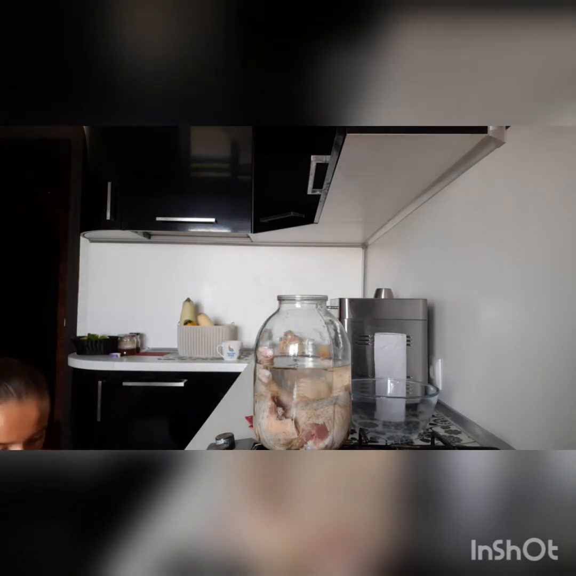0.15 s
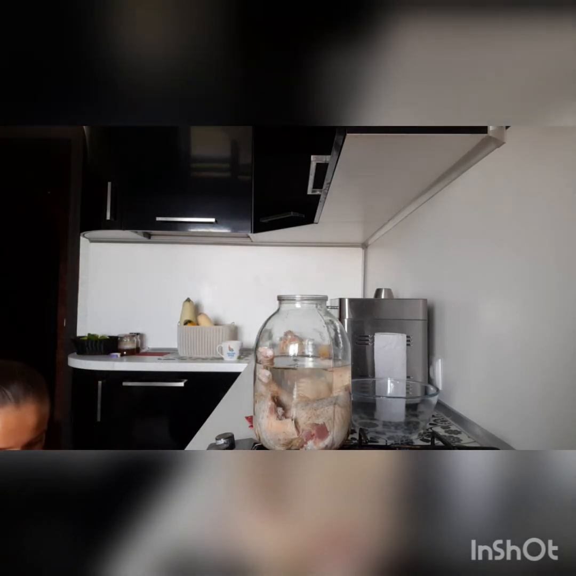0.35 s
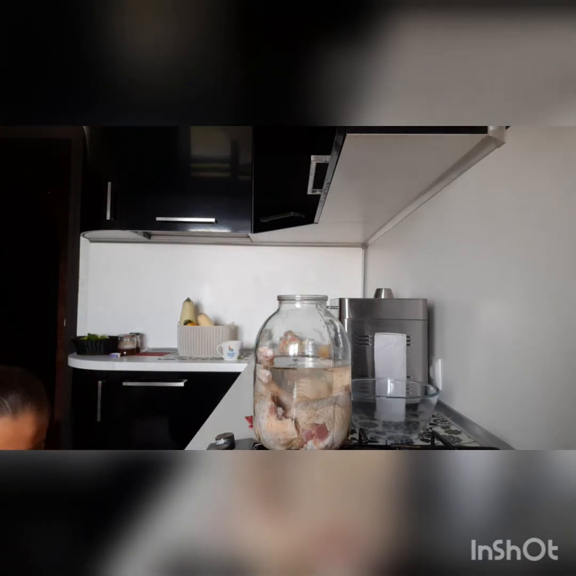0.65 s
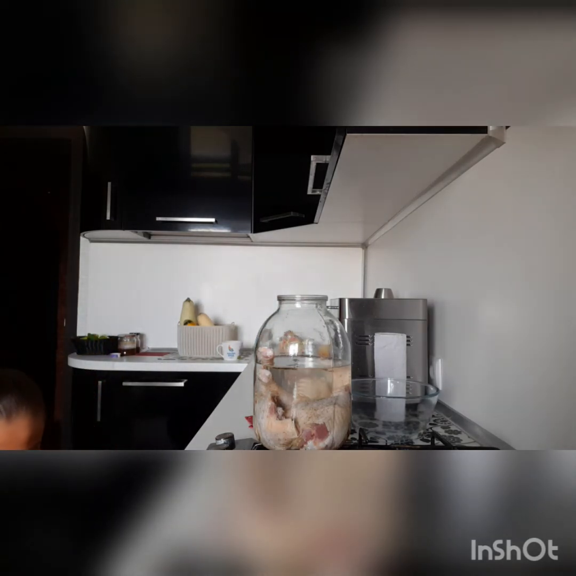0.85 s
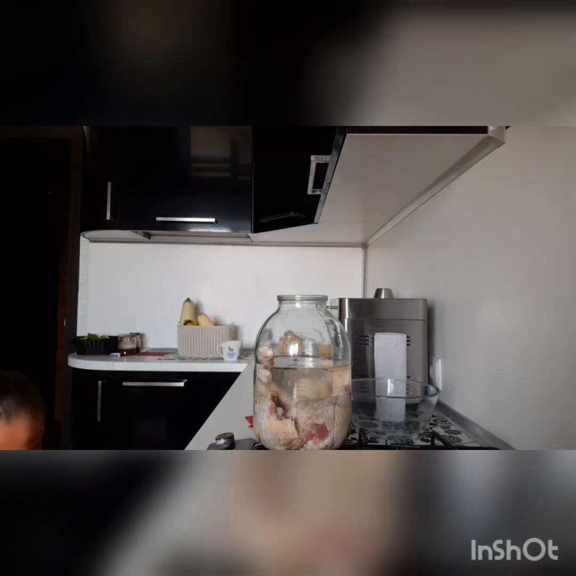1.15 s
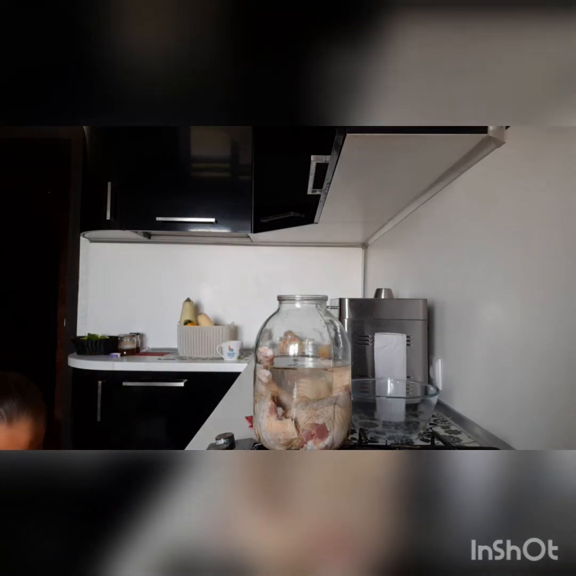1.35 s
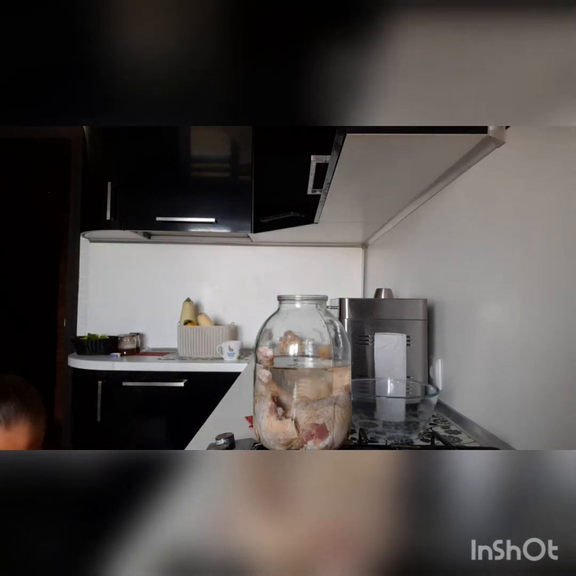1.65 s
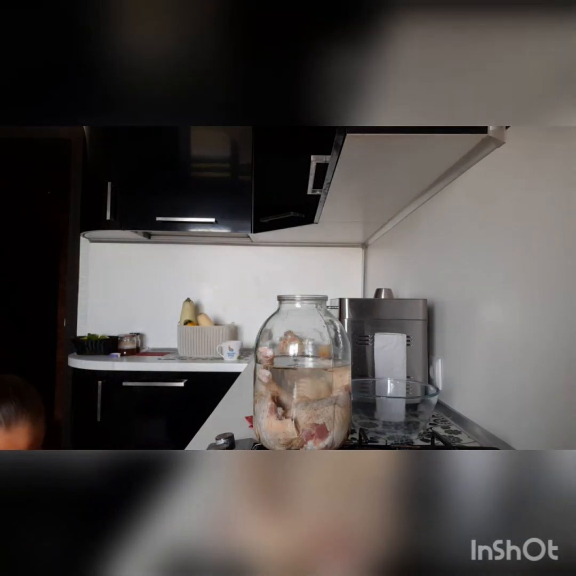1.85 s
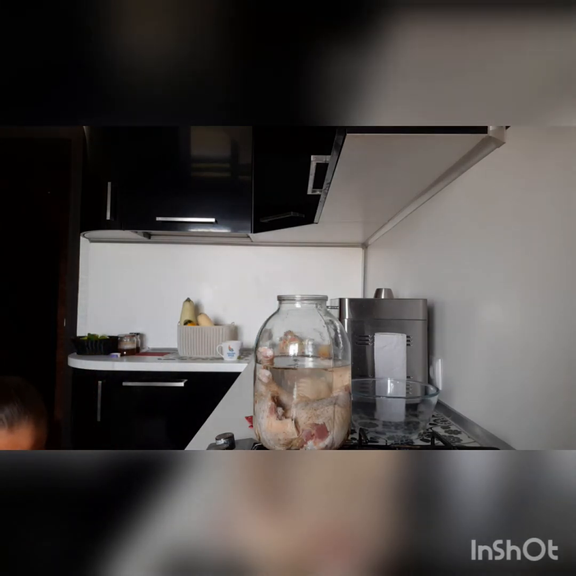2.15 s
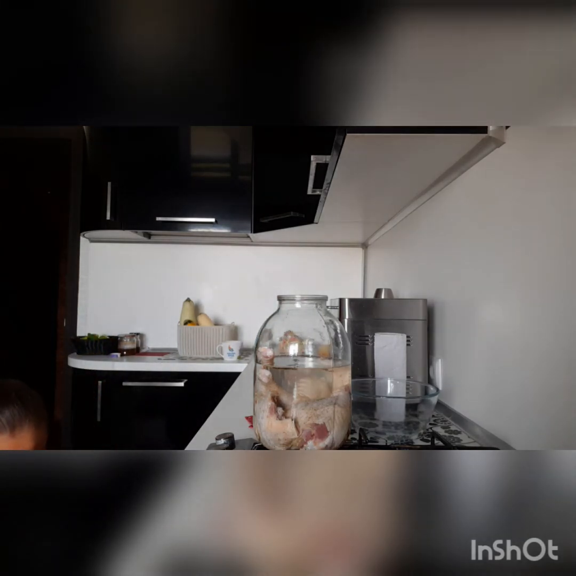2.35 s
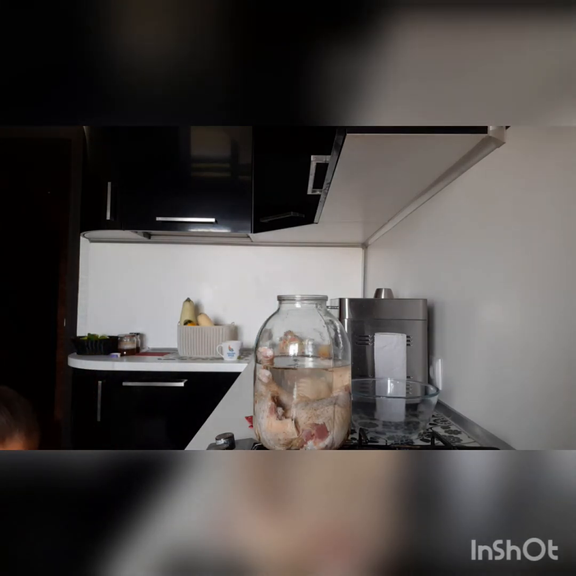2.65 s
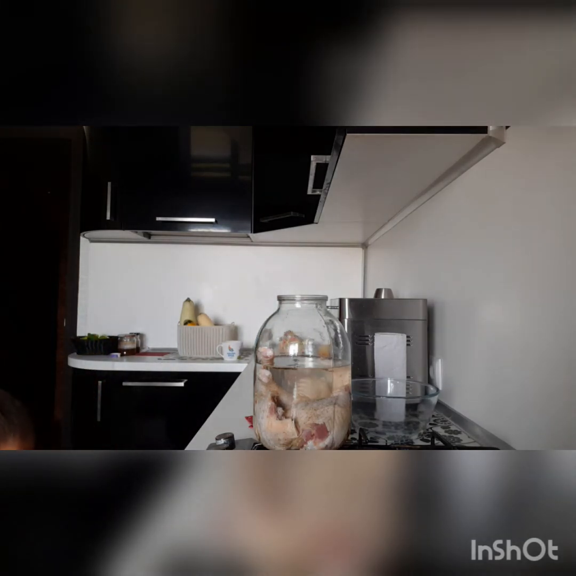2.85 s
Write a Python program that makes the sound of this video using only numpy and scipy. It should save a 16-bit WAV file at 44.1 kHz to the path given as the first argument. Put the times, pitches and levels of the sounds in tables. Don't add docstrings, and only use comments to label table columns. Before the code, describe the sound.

Wire rack dragged on enamel oven rails: a short clattering burst, about a second of near quiet, then louder knocks and fading scrapes with hollow booms; small live kitchen, distant stereo microphone, low refrigerator hum.

```python
import sys
import numpy as np
from scipy import signal
from scipy.fft import rfft, irfft
from scipy.io import wavfile

SR = 44100
rng = np.random.default_rng(int(sys.argv[2]) if len(sys.argv) > 2 else 0)


def transcribe(signal):
    frames = np.atleast_2d(signal).T
    limited = np.clip(frames, -1, 1)
    pcm = np.round(limited * 32767).astype(np.int16)
    wavfile.write(sys.argv[1], SR, pcm)


N = 132300


def from_db(db):
    return 10 ** (np.asarray(db) / 20)


def rms_one(x):
    return x / np.sqrt(np.mean(x ** 2) + 1e-20)


def at_hz(points, hz):
    table_hz, values = np.array(points).T
    return np.interp(np.log(hz + 1e-9), np.log(table_hz), values)


def colour(x, spectrum):
    gain = from_db(at_hz(spectrum, np.fft.rfftfreq(N, 1 / SR)))
    return irfft(rfft(x) * rms_one(gain), N)


def highpass(x, order, hz):
    return signal.sosfilt(signal.butter(order, hz, "high", fs=SR, output="sos"), x)


def drift(rate):
    r = np.exp(-2 * np.pi * rate / SR)
    noise = rng.standard_normal(N + SR)
    return rms_one(signal.lfilter([1], [1, -2 * r, r * r], noise)[SR:])


def ring(x, hz, t60):
    r = from_db(-60 / (max(t60, .003) * SR))
    w = 2 * np.pi * hz / SR
    return signal.lfilter([0, 2 * np.sin(w) * np.sqrt(1 - r)], [1, -2 * r * np.cos(w), r * r], x + 1e-18)


def stroke(start, length, fade_db, attack):
    t = np.arange(N) / SR - start
    rise = np.clip(t / attack, 0, 1)
    fall = np.clip((length - t) / attack + 1, 0, 1)
    return rise * fall * from_db(-fade_db * np.clip(t / length, 0, 1))


# pitch [Hz], left-right likeness [0 to 1].
PORT_LIKENESS = [(50, .93), (130, .95), (300, .72), (700, .65), (1500, .3), (3000, .05), (14000, .02)]
# pitch [Hz], left over right [dB].
PORT_LEAN = [(60, -2), (180, -3), (350, 0), (1000, 0), (14000, -0.5)]
RIGHT_LAG = 12.55


def ports(mid, side):
    hz = np.fft.rfftfreq(len(mid), 1 / SR)
    alike = np.clip(at_hz(PORT_LIKENESS, hz), 0, 1)
    lean = from_db(at_hz(PORT_LEAN, hz) / 2)
    m = rfft(mid) * np.sqrt((1 + alike) / 2)
    s = rfft(side) * np.sqrt((1 - alike) / 2)
    late = np.exp(-2j * np.pi * hz * RIGHT_LAG / SR)
    return irfft([(m + s) * lean, (m - s) / lean * late], len(mid))


# pitch [Hz], width [Hz], level [dB].
WHINES = [(214.7, 17, -63.5), (278, 2.9, -69.5), (587, 17, -83), (1062, 87, -68), (1573, 54, -70)]
# pitch [Hz], level [dB per Hz].
AIR_COLOUR = [(18, -77), (30, -53), (106, 2), (157, -29.5), (426, -25.5), (569, -17.5), (1670, -26.5),
              (1960, -37), (16000, -63.5)]
AIR_DB = -64.5
HUM_HZ, HUM_DB, HUM_WAVER_DB = 100, -53.5, 1.8
RUMBLE_HZ, RUMBLE_DB = 80, -60.5


def refrigerator_noise():
    whine = sum(from_db(db) * rms_one(ring(rng.standard_normal(N), hz, 1.0 / width))
                for hz, width, db in WHINES)
    air = highpass(colour(rng.standard_normal(N), AIR_COLOUR), 2, 130)
    air = air * from_db(0.5 * drift(2))
    rumble = from_db(RUMBLE_DB) * rms_one(ring(rng.standard_normal(N), RUMBLE_HZ, 0.0276))
    return whine + from_db(AIR_DB) * rms_one(air) + rumble


def refrigerator():
    level = from_db(HUM_DB + 4 + HUM_WAVER_DB * drift(3.4))
    hum = level * np.sin(2 * np.pi * HUM_HZ * np.arange(N) / SR)
    return ports(refrigerator_noise() + hum, refrigerator_noise())


ATTACK_S, LONGEST_RING_S = .003, .08
# start [s], length [s], pitch [Hz], level [dB], t60 [s].
SINGING = [(0.108, 0.13, 3368, -44, 0.015), (0.098, 0.04, 3300, -32, 0.0046),
           (0.107, 0.033, 4000, -30.5, 0.011), (0.093, 0.018, 6060, -45, 0.026),
           (0.294, 0.021, 4120, -47.5, .06), (0.333, 0.088, 5320, -52, 0.045), (.4, .18, 5320, -61, .08),
           (.14, .14, 11400, -44, .006), (1.638, .04, 12000, -33, .003), (1.875, .1, 11300, -43, .006),
           (1.99, .05, 12800, -41, .003), (1.995, .055, 10200, -44, .007), (2.065, .07, 9400, -46, .008),
           (0.16, 0.034, 1060, -38.5, .05), (0.19, 0.029, 720, -36, .06), (1.55, 0.02, 394, -37.5, .12),
           (1.65, 0.066, 510, -35, .1), (1.87, 0.056, 528, -45, .05), (1.984, 0.036, 530, -38, 0.035),
           (2.801, 0.041, 3100, -73, .03), (1.8, 0.046, 1100, -42, .03), (1.113, 0.031, 1850, -53, 0.01),
           (1.114, 0.089, 2330, -67, .01), (1.47, 0.043, 823, -36.5, 0.065), (1.44, 0.037, 426, -37, 0.097),
           (1.53, 0.046, 750, -42.5, 0.12), (1.68, 0.021, 2880, -47.5, 0.13),
           (2.226, 0.17, 2120, -58.5, 0.042), (1.6, 0.1, 2000, -66, 0.012), (0.7, 0.13, 1763, -69, 0.07),
           (0.78, 0.11, 597, -60, 0.052), (2.7, 0.04, 850, -52, .05)]
SKIRT_S, SKIRT_CYCLES = .012, 30
SING_FADE_DB = 7


def singing_wires():
    rub, out = rng.standard_normal(N), 0
    for start, length, hz, db, t60 in SINGING:
        rubbed = rub * stroke(start, length, SING_FADE_DB, ATTACK_S)
        tone = ring(rubbed, hz, min(t60, LONGEST_RING_S))
        out = out + from_db(db) * ring(tone, hz, min(SKIRT_S, SKIRT_CYCLES / hz)) / 8
    return out


GRIP_DB, GRIP_PER_S = 4.5, 1.1


def gripped_modes(push, modes, level_db):
    out = 0
    for hz, db, t60 in modes:
        grip = from_db(GRIP_DB * drift(GRIP_PER_S))
        out = out + from_db(level_db + db) * ring(push * grip, hz, min(t60, LONGEST_RING_S))
    return out


# start [s], length [s], chatter [dB],
# oven walls above the chatter [dB], treble above the chatter [dB].
CONTACTS = [(-.02, .02, -55, 2.5, 4.5), (0.095, 0.014, -55, 3, 5), (0.106, 0.016, -42, 0.5, 4),
            (0.118, 0.078, -34, 0, 5.5), (0.192, 0.043, -40.5, -1.5, 2), (0.244, 0.071, -44.5, 1, 6),
            (0.322, 0.055, -39.5, 0.5, 5.5), (0.4, 0.061, -68, -22, 10), (1.08, 0.11, -80.5, -16, 7),
            (1.419, 0.041, -53, 9.5, 4.5), (1.438, 0.015, -37.5, 0, 0), (1.444, .05, -32.5, 2, 0.5),
            (1.503, 0.022, -44, -4, 2), (1.54, 0.071, -52.5, 3, 1), (1.63, 0.05, -28.5, -1, 6.5),
            (1.69, 0.066, -51, -3, 10.5), (1.842, 0.044, -41.5, 0.5, 9.5), (1.871, .03, -41, -3, -2),
            (1.891, 0.059, -38.5, -5, 4.5), (1.959, 0.045, -50, -1, 1), (1.983, 0.018, -41, -1.5, 12.5),
            (1.999, 0.05, -38, -3, 6.5), (2.057, 0.083, -42, 0, 5), (2.139, 0.04, -45, 0, -8),
            (2.201, 0.099, -47, -1, -3), (2.328, 0.0668, -53.5, 1, 1.5), (2.482, 0.086, -60.5, 3, -8),
            (2.651, 0.071, -58, 0.5, -9), (2.777, 0.16, -67, 6, -36.5), (2.936, 0.04, -61.5, 6, 0),
            (2.966, .05, -60, 0, 4)]
# pitch [Hz], level [dB], t60 [s].
WIRE_MODES = [(2093, 12.5, 0.033), (2480, -39.5, 0.34), (2680, 4.5, 0.031), (2760, -0.5, .12),
              (3190, -51, 0.36), (3315, -2, 0.24), (3580, -1, .12), (4120, -14, 0.086), (4180, -12.5, 0.15),
              (4400, -12, 0.11), (4800, -3.5, 0.063)]
# pitch [Hz], level [dB], t60 [s].
WALL_MODES = [(416, -1, 0.17), (506, -10, .08), (539, -9, 0.069), (568, -1, 0.059), (675, -4, 0.13),
              (764, -5, .07), (820, 2.5, 0.04), (891, -1, 0.03), (918, -3.5, 0.11), (1116, -19, 0.08),
              (1252, -1.5, 0.057), (1587, -1, 0.12)]
# pitch [Hz], level [dB per Hz].
CHATTER_COLOUR = [(500, -30), (1000, -8.5), (2000, 2), (3500, -4), (5000, -4), (7500, -15.5), (11500, -15),
                  (16000, -19.5)]
# pitch [Hz], level [dB per Hz].
WALL_COLOUR = [(130, -17), (230, -6), (330, -9), (450, -9.5), (650, -4), (900, -5.5), (1300, -6.5),
               (2500, -37.5)]
TICKS_PER_S, TICK_SPREAD_DB, JUDDER_DB, JUDDER_PER_S = 2500, 4, 1, 41
FADE_DB_PER_S, TREBLE_HZ = 46.5, 4820
SOFT_ATTACK_S, SOFT_BELOW_DB = 0.048, -60
CRACK_DB = 19
WALLS_LATE_S = .002
WIRES_DB, WALL_RING_DB = -23.5, -5


def rack():
    sizes = from_db(TICK_SPREAD_DB * np.minimum(rng.exponential(1, N), 5)) * rng.choice([-1, 1], N)
    happens = rng.random(N) < TICKS_PER_S / SR
    ticks = rms_one(sizes * happens * from_db(JUDDER_DB * drift(JUDDER_PER_S)))
    strokes = []
    for start, length, db, _, _ in CONTACTS:
        firm = db > SOFT_BELOW_DB
        attack = ATTACK_S if firm else SOFT_ATTACK_S
        row = ticks * from_db(db) * stroke(start, length, FADE_DB_PER_S * length, attack)
        row[max(int((start + ATTACK_S) * SR), 0)] += from_db(db + CRACK_DB) * firm
        strokes.append(row)
    strokes = np.array(strokes)
    chatter = strokes.sum(0)
    on_walls = from_db(np.array(CONTACTS)[:, 3]) @ strokes
    on_walls = np.roll(on_walls, int(WALLS_LATE_S * SR))
    bright = from_db(np.array(CONTACTS)[:, 4]) @ strokes

    wires = gripped_modes(chatter, WIRE_MODES, WIRES_DB - 14.0)
    walls = gripped_modes(on_walls, WALL_MODES, WALL_RING_DB - 11.0)
    treble_cut = 1 + (TREBLE_HZ / (np.fft.rfftfreq(N, 1 / SR) + 1)) ** 4
    treble = irfft(rfft(bright - chatter) / treble_cut, N)
    scrape = colour(chatter + treble, CHATTER_COLOUR)
    return scrape + wires + walls + singing_wires() + from_db(1.5) * colour(on_walls, WALL_COLOUR)


# start [s], level [dB], pitch favoured [Hz], length [s].
THUDS = [(0.112, -34, 130, 0.062), (0.144, -36.5, 70.1, 0.096), (0.244, -38.5, 152.4, 0.057),
         (0.318, -37.5, 169, 0.053), (0.341, -38.5, 69.6, 0.088), (1.441, -33.5, 91.7, 0.056),
         (1.63, -29, 290, 0.035), (1.699, -37, 167, 0.046), (1.848, -36, 148, 0.086),
         (1.901, -42.5, 204, 0.023), (1.987, -31.5, 90.6, 0.083), (2.07, -38, 79.3, 0.17),
         (2.127, -42, 178, 0.053), (2.207, -42.5, 222, 0.072), (2.322, -44, 128, 0.0775),
         (2.439, -47, 172, .05), (2.527, -44.5, 96.5, .08), (2.726, -46.5, 84.5, .2),
         (1.15, -50.5, 74.6, .18)]
# pitch [Hz], level [dB], t60 [s].
CABINET_MODES = [(59.4, -25, .3), (75.2, -2, 0.58), (98.3, -9.5, .25), (118.2, -5.5, 0.058),
                 (167, -5.5, 0.076), (189.4, -6.5, 0.082), (247, -8, .05), (290, -1, 0.06)]
THUD_OCTAVES = 0.8
THUD_FADE_DB = 6.5
LONGEST_BOOM_S = .2


def cabinet():
    out = 0
    for hz, mode_db, t60 in CABINET_MODES:
        force = 0
        for start, db, favoured_hz, length in THUDS:
            nearness = np.exp(-(np.log2(hz / favoured_hz) / THUD_OCTAVES) ** 2)
            force = force + from_db(db + mode_db) * nearness * stroke(start, length, THUD_FADE_DB, 0.0025)
        out = out + ring(rng.standard_normal(N) * force, hz, min(t60, LONGEST_BOOM_S * 100 / hz))
    return highpass(out, 4, 44)


# start [s], peak [dB], pitch [Hz], length [s].
BOOMS = [(.132, -30.5, 115.7, .018), (0.151, -26, 84.2, 0.038), (0.213, -30.5, 88.3, 0.025),
         (.276, -29, 91.3, 0.015), (0.373, -38.5, 94, 0.018), (0.375, -38.5, 80, 0.0096),
         (1.455, -30.5, 117, 0.021), (1.494, -37.5, 117, 0.0094), (1.547, -37, 112, 0.013),
         (1.634, -20.5, 125, 0.041), (1.698, -26.5, 132, 0.018), (1.735, -30, 112.3, 0.028),
         (1.881, -26, 116.3, 0.034), (1.93, -32, 135, 0.015), (1.975, -32, 109.6, 0.046),
         (2.095, -35.5, 134, 0.02), (2.212, -31, 94.6, 0.024), (2.263, -33, 103, 0.012),
         (2.338, -43.5, 83.5, 0.026)]
SHARP_SHARE, SAG_S, HARD_DB = 1, 0.0054, -19
BOOM_RISE_S, BOOM_FALL_S = 0.0083, 0.0062


def side_panel():
    t, out = np.arange(N) / SR, 0
    for start, db, hz, length in BOOMS:
        u = np.clip(t - start, 0, None)
        sharp = SHARP_SHARE * from_db(min(db - HARD_DB, 0))
        turns = hz * (u + sharp * SAG_S * (1 - np.exp(-u / SAG_S)))
        swell = np.clip(u / BOOM_RISE_S, 0, 1) * np.exp(-np.clip(u - length, 0, None) / BOOM_FALL_S)
        out = out + from_db(db) * swell * np.sin(2 * np.pi * turns)
    return out


# pitch [Hz], t60 [s].
KITCHEN_T60 = [(100, 0.5), (500, 0.27), (2000, 0.34), (6000, 0.3), (14000, 0.203)]
DIRECT_DB, BUILD_S = -13, 0.00033
PLACE_S = .07


def kitchen(x, count=5):
    t, tails = np.arange(SR // 2) / SR, 0
    edges = 40 * 2. ** np.arange(0, 9.6) * .99
    for low, high in zip(edges, edges[1:]):
        octave = signal.butter(2, [low, high], "band", fs=SR, output="sos")
        band = signal.sosfilt(octave, rng.standard_normal((count, 2, len(t))))
        fall = from_db(-60 * t / at_hz(KITCHEN_T60, np.sqrt(low * high))) * (1 - np.exp(-t / BUILD_S))
        tails = tails + band * fall / np.sqrt(np.sum(fall ** 2))
    tails[:, 0, 0] += from_db(DIRECT_DB)

    place, heard = np.arange(N) / SR / PLACE_S, 0
    for k, tail in enumerate(tails):
        away = np.abs((place - k + count / 2) % count - count / 2)
        share = np.cos(np.pi / 2 * np.clip(away, 0, 1))
        heard = heard + signal.fftconvolve((x * share)[None], tail, axes=1)[:, :N]
    mid, side = heard
    return ports(mid, side)


def scene():
    boom = cabinet()
    in_room = kitchen(rack() + from_db(-3.0) * boom)
    low_end = ports(boom + side_panel(), np.roll(boom, 90))
    return in_room + low_end + refrigerator()


def band_limit(x):
    return signal.sosfilt(signal.butter(12, 16960, fs=SR, output="sos"), x)


# pitch [Hz], level [dB per Hz].
HISS_COLOUR = [(3000, -53), (7000, -4.5), (10000, -5), (13000, 8), (16000, 5.5)]
HISS_DB, CUTOFF_HZ = -80, 16000


def record(dry):
    hiss = from_db(HISS_DB) * np.array([colour(rng.standard_normal(N), HISS_COLOUR) for _ in dry])
    x = highpass(dry + hiss, 4, 48)
    top_cut = signal.cheby2(18, 60, CUTOFF_HZ + 150, fs=SR, output="sos")
    return band_limit(signal.sosfilt(top_cut, x))


dry = scene()
out = record(dry)
transcribe(out)
```